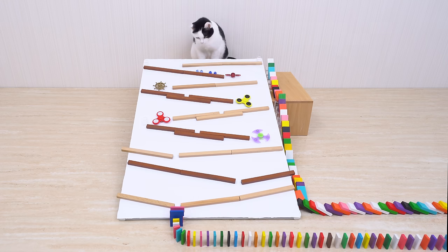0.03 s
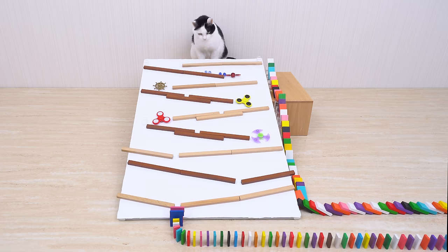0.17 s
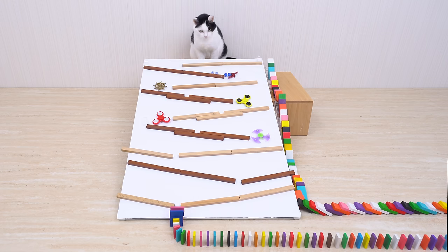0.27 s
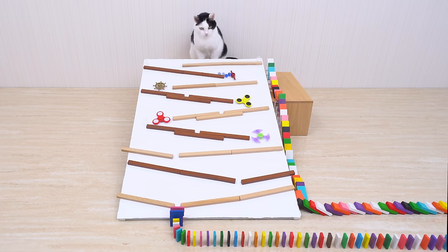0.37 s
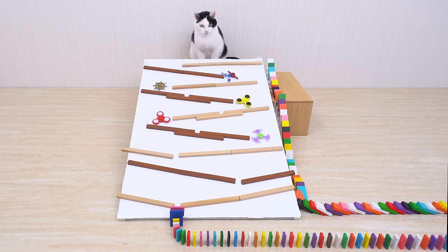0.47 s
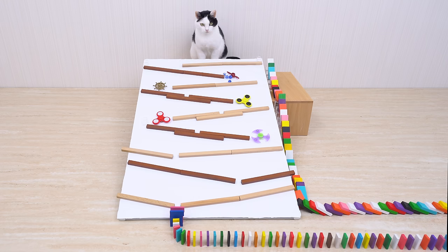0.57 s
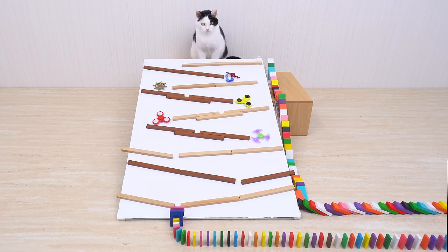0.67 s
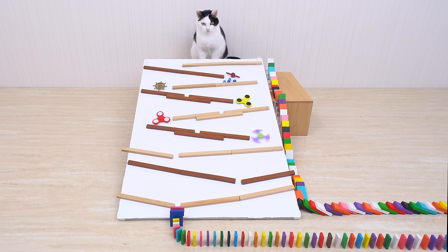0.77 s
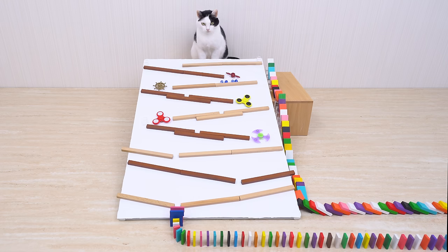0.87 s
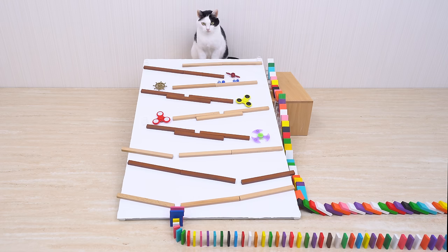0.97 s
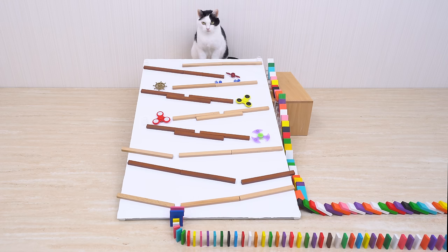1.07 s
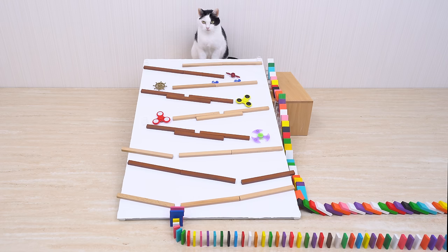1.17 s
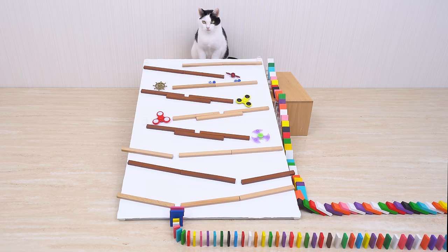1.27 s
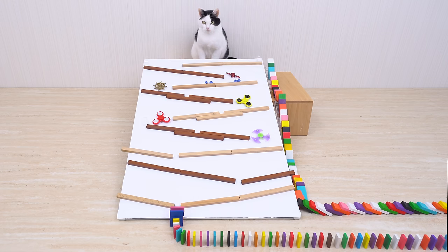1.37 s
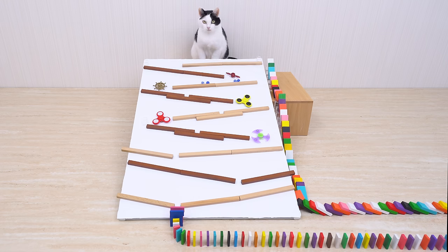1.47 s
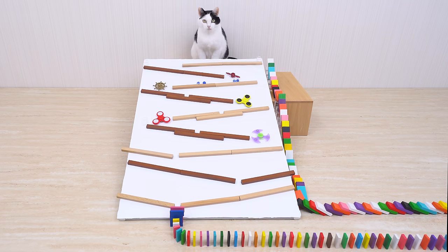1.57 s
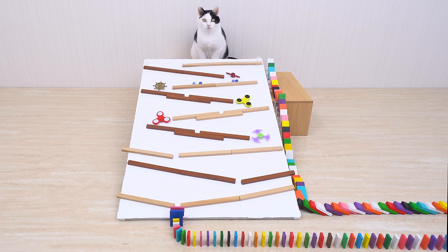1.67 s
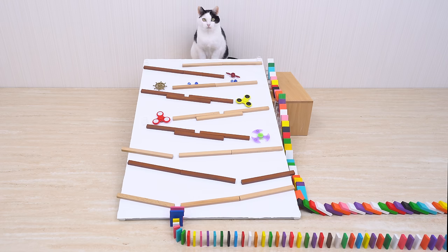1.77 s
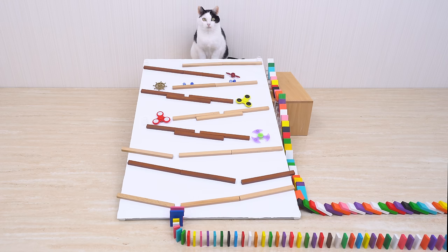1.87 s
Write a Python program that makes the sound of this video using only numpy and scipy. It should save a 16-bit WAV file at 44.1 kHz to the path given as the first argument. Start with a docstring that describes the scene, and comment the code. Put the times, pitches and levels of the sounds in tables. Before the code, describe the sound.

Marbles click and clack down a slatted wooden board over a hollow rolling rumble.

```python
"""A hollow rumble of glass marbles rolling down wooden slats on a tilted board, in a small, live room.
The marbles click against each other and ring the metal of a spinner. One by one they drop onto the
next slat, each landing a sharp crack over a thump of the board and a ring of the wood. They roll on
more quietly, with two light knocks, until one brushes a small wheel into a faint hiss."""
import sys
import numpy as np
from scipy import signal
from scipy.fft import rfft, irfft
from scipy.io import wavfile

SR = 44100
rng = np.random.default_rng(int(sys.argv[2]) if len(sys.argv) > 2 else 0)


def master_out(mix):
    """Clip the mix to full scale and print it as 16-bit PCM to the path in sys.argv[1]."""
    frames = np.transpose(np.atleast_2d(mix))
    ceiling = np.clip(frames, -1, 1)
    pcm = np.round(ceiling * 32767).astype(np.int16)
    wavfile.write(sys.argv[1], SR, pcm)


N = 83790
T = np.arange(SR) / SR  # one second, the time axis of a single hit


def amp(db):
    """Decibels to gain."""
    return 10 ** (np.asarray(db) / 20)


def unit_rms(x):
    """Scales to an rms of one."""
    return x / np.sqrt(np.mean(x ** 2) + 1e-20)


def decay(age_s, t60_s):
    """An envelope that falls 60 dB in t60_s."""
    return np.exp(-np.log(1000) * age_s / t60_s)


def at_freq(points, hz):
    """Reads a table on a log-frequency axis."""
    freqs, values = np.transpose(points)
    return np.interp(np.log(hz + 1), np.log(freqs), values)


def add(track, start_s, sound):
    """Lays a sound onto a track."""
    part = track[round(start_s * SR):][:len(sound)]
    part += sound[:len(part)]


def equalise(x, eq, size=4096):
    """Minimum-phase filter that follows an EQ curve."""
    log_gain = np.log(amp(at_freq(eq, abs(np.fft.fftfreq(size, 1 / SR)))))
    taps = np.fft.ifft(np.exp(np.conj(signal.hilbert(log_gain)))).real[:size // 2]
    return signal.fftconvolve(x, taps)[:len(x)]


def wobble(cutoff_hz, length):
    """A smooth random modulator."""
    lowpass = signal.butter(2, cutoff_hz, fs=SR, output="sos")
    return unit_rms(signal.sosfilt(lowpass, rng.standard_normal(length)))


def sine(hz):
    """One mode's tone, at a random phase."""
    return np.sin(2 * np.pi * (hz * T + rng.random()))


def wood_ring(modes, rise_s, hold_s=0):
    """Modes of struck wood swell, hold for hold_s and die."""
    age = np.maximum(T - hold_s, 0)
    tones = sum(amp(db) * decay(age, t60_s) * sine(hz) for hz, db, t60_s in modes)
    return tones * (1 - np.exp(-T / rise_s))


def wash(eq, t60_s, rise_s):
    """Many close modes dying together, heard as coloured noise."""
    noise = unit_rms(equalise(rng.standard_normal(SR), eq))
    return noise * decay(T, t60_s) * (1 - np.exp(-T / rise_s))


def contact(eq, spread_s, bright_hz=None, size=2048, paths=3, scatter=0.6):
    """A hard hit of unit energy: a pulse and its reflection off the board, scattered among the slats."""
    pulse = np.zeros(size)
    pulse[0] = 1
    pulse[round(0.000755 * SR)] = 0.078  # off the board
    for path_s in spread_s * (np.arange(paths) + 1 + rng.random(paths)) / paths:
        delay = np.exp(-2j * np.pi * np.fft.rfftfreq(size) * round(path_s * SR))
        pulse = irfft(rfft(pulse) * (delay - scatter) / (1 - scatter * delay))  # all-pass smear
    pulse = equalise(pulse, eq)
    if bright_hz:
        pulse = signal.lfilter(*signal.butter(2, bright_hz, fs=SR), pulse)
    return pulse / np.linalg.norm(pulse)


# The board's resonances, under both rolling and landings: pitch_hz, level_db, t60_s
BOARD_MODES = [(245.6, -11.5, 0.14), (284.2, -6.5, 0.092), (385, -10, .16), (405.1, -3, .2),
               (444.6, -3, .18), (494.7, -4.5, 0.33), (521.7, -8, 0.15), (567.2, 0, .24), (586.4, -9, .18),
               (862, -10, 0.2), (887, -22, 0.56), (1006, -23, 0.22)]
# Hollow tone of the rumble: freq_hz, gain_db
RUMBLE_EQ = [(30, -57.5), (70, -14), (130, -18), (220, -22), (390, 0), (560, -5), (690, -7), (870, -5),
             (1250, -18.5), (2500, -19.5), (4200, -23.5), (6000, -41.5), (12000, -56)]
# Fader ride on the rolling: time_s, level_db
ROLL_FADER = [(0, -53.5), (.18, -58), (.34, -55), (.42, -57.5), (.52, -55), (.68, -57.5), (.85, -58.5),
              (.98, -53), (1.1, -70.5), (1.3, -72), (1.5, -68.5), (1.68, -70.5), (1.84, -67.5), (1.9, -65)]
BOARD_RISE_S = 0.0063


def rolling(bumps_per_s=1000, bump_spread_db=3, drift_depth=0.022, grit_hz=1580):
    """Tiny, uneven bumps in the wood drive the board and its modes into a hollow rumble."""
    sizes = amp(bump_spread_db * np.minimum(rng.exponential(1, N), 3))
    bumps = sizes * rng.choice([-1., 1.], N) * (rng.random(N) < bumps_per_s / SR)
    ringing = irfft(rfft(bumps) * rfft(wood_ring(BOARD_MODES, BOARD_RISE_S), N), N)
    # The board's resonances shift as the marbles travel.
    pitch_ratio = 1 + drift_depth * wobble(cutoff_hz=7, length=N)
    ringing = np.interp(np.cumsum(pitch_ratio), np.arange(N), ringing, period=N)
    body = equalise(bumps + room(bumps), RUMBLE_EQ)
    rumble = unit_rms(unit_rms(body) + amp(-3.5) * unit_rms(ringing))
    # Faster rolling is grittier: the treble follows the fader.
    level_db = np.interp(np.arange(N) / SR, *np.transpose(ROLL_FADER))
    grit = signal.sosfiltfilt(signal.butter(2, grit_hz, "high", fs=SR, output="sos"), rumble)
    grit_gain = amp(0.77 * (level_db - level_db.max()))
    return amp(level_db) * (rumble + grit * (grit_gain - 1))


# Dark tone of the room's air: freq_hz, gain_db
AIR_EQ = [(25, -4), (70, 1.5), (200, 8), (500, 5), (1500, -3.5), (3500, -24), (7000, -18), (12000, -20.5),
          (14000, -31), (17000, -29.5)]


def room_tone():
    """The room's quiet air, a steady bed of noise."""
    return amp(-74.5) * unit_rms(equalise(rng.standard_normal(N), AIR_EQ))


# Early reflections: delay_s, level_db
REFLECTIONS = [(.0028, -18.5), (0.0133, -12), (0.018, -16)]
# Reverb time across the spectrum: freq_hz, t60_s
TAIL_DECAY = [(150, 0.27), (500, 0.43), (1500, 0.54), (3500, 0.48), (7000, 0.48), (11000, 0.36),
              (16000, 0.36)]
# Tone of the reverb tail: freq_hz, gain_db
TAIL_EQ = [(100, -1.5), (500, 2.5), (1500, -3.5), (3500, -3), (7000, -3), (11000, -5), (16000, -7.5)]


def room(x, build_s=0.012, reflection_cutoff_hz=7000):
    """A small room returns dull early reflections and a diffuse tail that lasts longest in the mids."""
    hz, t, spectrum = signal.stft(rng.choice([-1., 1.], SR), SR, nperseg=256)
    spectrum *= decay(t, at_freq(TAIL_DECAY, hz)[:, None])
    spectrum *= amp(at_freq(TAIL_EQ, hz))[:, None]
    response = signal.istft(spectrum, SR, nperseg=256)[1][:SR]
    response *= amp(-29) * np.minimum(T / build_s, 1) ** 2
    dull_pulse = signal.lfilter(*signal.butter(1, reflection_cutoff_hz, fs=SR), T == 0)
    for delay_s, level_db in REFLECTIONS:
        add(response, delay_s, amp(level_db) * dull_pulse)
    return signal.fftconvolve(x, response)[:N]


# Glass striking glass or metal: start_s, level_db, send_db
CLICK_CUES = [(.180, -58.5, 11), (0.2403, -27, -3), (0.2848, -30.5, 6), (.303, -28, 5), (0.35, -25.5, -1.5),
              (.370, -36, 17), (0.4429, -16, 4), (.450, -29, 7), (0.4936, -15.5, 3), (.562, -27.5, 0),
              (.588, -23.5, -9), (0.7241, -13, -5), (0.7277, -30.5, -8.5), (0.7756, -21, 1),
              (0.8501, -21, 3), (0.8507, -14.5, -3.5), (1.249, -59, 12)]
# Bright tone of a glass click: freq_hz, gain_db
GLASS_EQ = [(200, -28), (1500, -25), (3500, -12), (5500, -6), (7600, 1), (11000, -1.5), (13000, -5.5),
            (15300, -5), (16800, -28.5)]


def clicks():
    """Hard glass makes very short, bright clicks; returns the direct sound and its reverb send."""
    direct, send = np.zeros((2, N))
    for start_s, level_db, send_db in CLICK_CUES:
        click = amp(level_db) * contact(GLASS_EQ, spread_s=0.00016)
        add(direct, start_s, click)
        add(send, start_s, amp(send_db) * click)
    return direct, send


# Marbles landing on or bumping a slat:
# start_s, crack_db, thump_db, slat_db, hollow_db, woody_db, bright_hz
LANDING_CUES = [(.188, -60, -54, -101, -69, -99, 3100), (.362, -36, -51.5, -80, -66, -56.5, 3200),
                (0.448, -56, -49.5, -67, -70, -70, 5030), (.486, -30.5, -48.5, -66.5, -50, -65, 1490),
                (0.529, -41, -64.5, -76.5, -68, -55, 2500), (.588, -11, -42, -46.5, -60, -49, 10210),
                (0.7246, -16, -38.5, -63, -54, -71.5, 10200), (.7752, -26, -55, -60.5, -53.5, -52.5, 8000),
                (0.8102, -15.5, -40, -55.5, -48, -56, 8300), (0.854, -14.5, -47, -51, -50, -50.5, 5180),
                (0.9254, -14.5, -41, -63.5, -78, -52.5, 7450),
                (1.1799, -33.5, -64.5, -85.5, -63.5, -71, 3250),
                (1.3041, -34.5, -62, -87, -57.5, -65, 2890), (1.892, -61, -54, -84, -77, -82, 1970)]
# The slats' high resonances: pitch_hz, level_db, t60_s
SLAT_MODES = [(2748, -5, .4), (3027, -5.5, .38), (3143, -2.5, .38), (3242, -2, .34), (3324, -3, .33),
              (3362, -3.5, .32), (3418, 1, .34), (3478, -6, .34)]
# Tones of the crack, board thump, hollow knock, woody ring and slat ring: freq_hz, gain_db
CRACK_EQ = [(100, -26.5), (250, 0.5), (500, 5), (1000, 1), (1650, 0), (2150, 4), (2550, 0), (3250, 10),
            (3800, 1.5), (4400, 3), (5000, -1.5), (5600, 1), (7000, -11), (10000, -9), (15500, 0),
            (17000, -20)]
THUMP_EQ = [(30, -62), (70, -28), (130, -24), (205, -27.5), (255, -2.5), (330, -3), (420, 5.5), (570, 1),
            (680, -13), (1000, -11), (1600, -23.5), (5000, -63)]
HOLLOW_EQ = [(100, -33.5), (600, -15), (860, -8), (985, 5.5), (1060, -7), (1160, -4), (1400, -9.5),
             (3000, -44.5), (12000, -62)]
WOODY_EQ = [(800, -32), (1500, -10.5), (1850, 0.5), (2150, 2.5), (2400, -12), (2800, -1), (3250, -18),
            (3900, -16), (4220, -0.5), (4600, -10), (5400, -23.5), (12000, -41.5)]
SLAT_EQ = [(1000, -29.5), (2700, -18), (3100, -6.5), (3400, -1), (3650, -12.5), (4400, -12), (6500, -34),
           (14000, -61.5)]


def landings(hold_s=0.014, damping_db_per_s=164.5, slat_rise_s=0.0032):
    """Each landing cracks on the slat, thumps the board and sets the wood ringing."""
    cracks, body, rings = np.zeros((3, N))
    for start_s, crack_db, thump_db, slat_db, hollow_db, woody_db, bright_hz in LANDING_CUES:
        add(cracks, start_s, amp(crack_db) * contact(CRACK_EQ, spread_s=0.0004, bright_hz=bright_hz))
        thump = wood_ring(BOARD_MODES, BOARD_RISE_S, hold_s) / 2
        thump += amp(-1) * wash(THUMP_EQ, 0.087, BOARD_RISE_S)
        thump *= amp(-damping_db_per_s * np.maximum(T - hold_s, 0))  # tightens both decays
        thump *= amp(thump_db) * np.sqrt(SR * hold_s) / np.linalg.norm(thump)
        add(body, start_s, thump)
        add(body, start_s + 0.043, amp(-12) * thump)  # a far wall returns the thump
        add(body, start_s, amp(hollow_db) * wash(HOLLOW_EQ, t60_s=0.18, rise_s=0.00089))
        add(body, start_s, amp(woody_db) * wash(WOODY_EQ, t60_s=0.33, rise_s=0.004))
        slat = wood_ring(SLAT_MODES, slat_rise_s) / 2
        slat += amp(-3.5) * wash(SLAT_EQ, t60_s=0.21, rise_s=slat_rise_s)
        add(rings, start_s, amp(slat_db) * slat)
    return cracks, body, rings


def metal_ring(modes, hold_s, rise_s=0.0012):
    """Each mode of struck metal holds for hold_s, falls quickly and leaves a softer, long after-ring."""
    age = np.maximum(T - hold_s, 0)
    tones = np.zeros(SR)
    for hz, level_db, t60_s, after_db, after_t60_s in modes:
        fade = np.hypot(decay(age, t60_s), amp(after_db) * decay(age, after_t60_s))
        tones += amp(level_db) * fade * sine(hz)
    return tones * (1 - np.exp(-T / rise_s))


# Marbles striking the spinner: start_s, low_db, middle_db, high_db
SPINNER_CUES = [(0.2405, -55.5, -58.5, -42.5), (.260, -44.5, -50, -76.5), (0.304, -59, -53, -64.5),
                (0.327, -57.5, -48, -76), (.3497, -52.5, -48, -42), (0.48, -60.5, -43.5, -65),
                (0.4938, -72, -35, -49.5)]
# Its low cluster, middle pair and high pair of modes: pitch_hz, level_db, t60_s, after_db, after_t60_s
LOW_MODES = [(4150, -8, .12, -20, .3), (4195, -3, .16, -17, .35), (4238, -2, .17, -15, .4),
             (4301, -3, .16, -16, .35), (4368, -6, .12, -18, .3)]
MIDDLE_MODES = [(7908, 0, .13, -17, .4), (8156, -2.5, .14, -6, .52)]
HIGH_MODES = [(15107, 0, .08, -22, .3), (15516, -14, .15, -4, .8)]
# Tone of the metal's shimmer: freq_hz, gain_db
SHIMMER_EQ = [(1500, -21.5), (3600, -4.5), (4250, 0), (5000, -9.5), (7000, -13), (10000, -6), (14000, -2),
              (15600, -10), (16300, -26.5)]


def spinner():
    """The metal rings in beating groups of modes over a short shimmer; each blow favours other modes."""
    track = np.zeros(N)
    for start_s, low_db, middle_db, high_db in SPINNER_CUES:
        for level_db, modes, depth, hold_s in ((low_db, LOW_MODES, 1, 0),
                                               (middle_db, MIDDLE_MODES, 0.08, 0.019),
                                               (high_db, HIGH_MODES, 0.2, 0.0073)):
            flutter = unit_rms(1 + depth * wobble(cutoff_hz=70, length=SR))  # as the spinner turns
            add(track, start_s, amp(level_db) * flutter * metal_ring(modes, hold_s))
        add(track, start_s, amp(high_db - 9) * wash(SHIMMER_EQ, t60_s=0.25, rise_s=0.00019))
    return track


# Resonances of the small metal wheel: pitch_hz, width_hz, level_db
WHEEL_MODES = [(3360, 530, -2.5), (4200, 330, -1.5), (5930, 190, -8.5), (11500, 210, -9),
               (15500, 400, -16.5)]


def wheel_brush(start_s=1.843, rise_s=0.0093):
    """Light friction from a marble sets the wheel's resonances hissing."""
    friction = rng.standard_normal(N)
    hiss = np.zeros(N)
    for hz, width_hz, level_db in WHEEL_MODES:
        band = signal.lfilter(*signal.iirpeak(hz, hz / width_hz, SR), friction)
        hiss += amp(level_db) * unit_rms(band)
    fade_in = np.clip((np.arange(N) / SR - start_s) / rise_s, 0, 1)
    return amp(-76.5) * unit_rms(hiss) * fade_in


def scene():
    """The mono mix: hits and their reverb over room tone and rolling, with the wheel at the end."""
    cracks, body, rings = landings()
    glass, glass_send = clicks()
    metal = spinner()
    hits = cracks + glass + rings + body + metal
    reverb = room(cracks + glass_send + amp(5.5) * rings + amp(-10.5) * body + amp(-16) * metal)
    return (hits + reverb + room_tone() + rolling() + wheel_brush())[None]


def record(dry):
    """A steep high cut at 16.4 kHz on the whole mix."""
    high_cut = signal.firwin(301, 16400, window=("kaiser", 9), fs=SR)
    return signal.oaconvolve(dry, high_cut[None], "same")


dry = scene()
out = record(dry)
master_out(out)
```